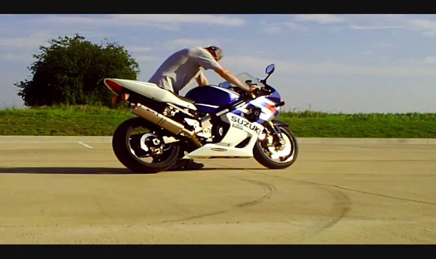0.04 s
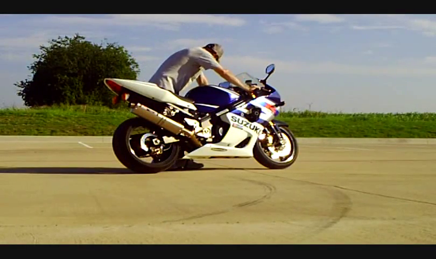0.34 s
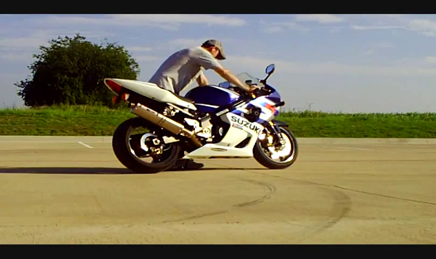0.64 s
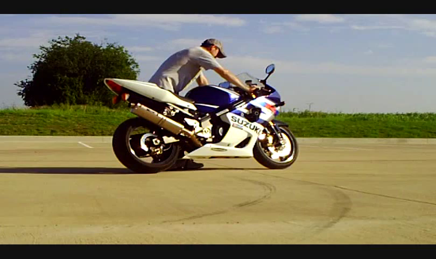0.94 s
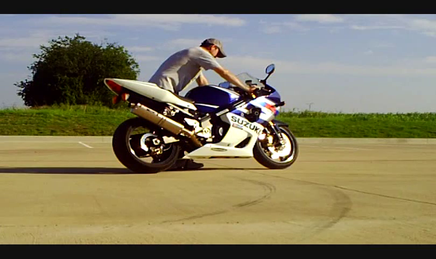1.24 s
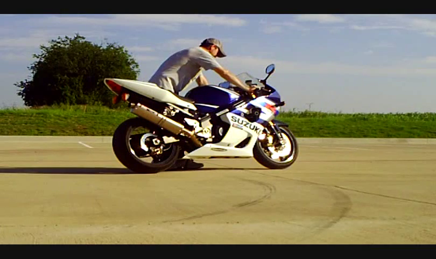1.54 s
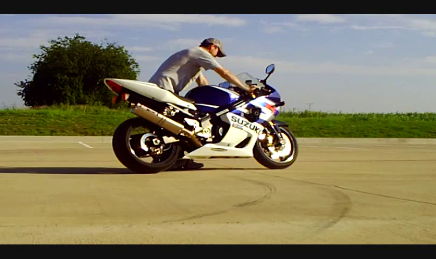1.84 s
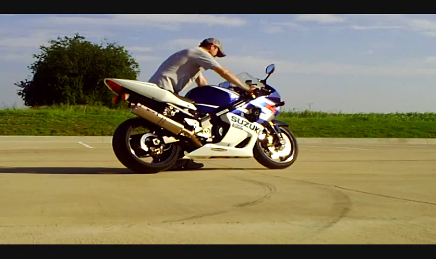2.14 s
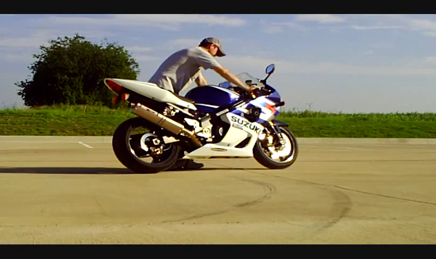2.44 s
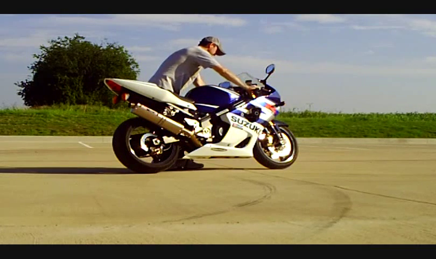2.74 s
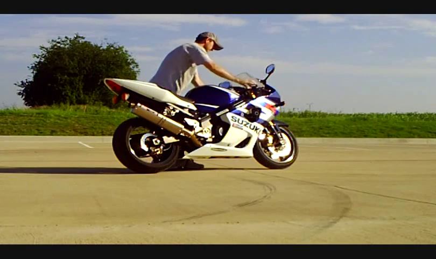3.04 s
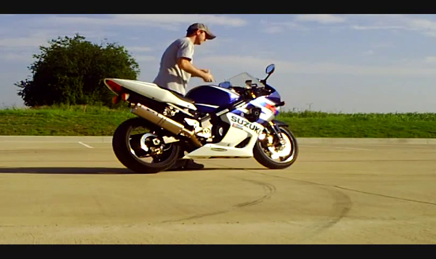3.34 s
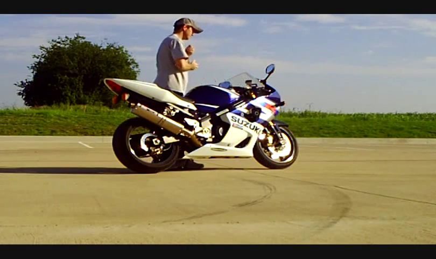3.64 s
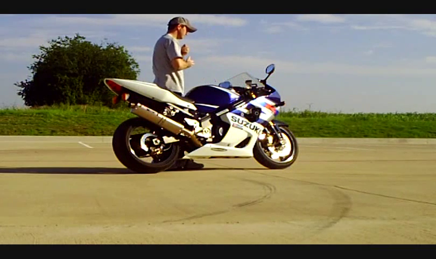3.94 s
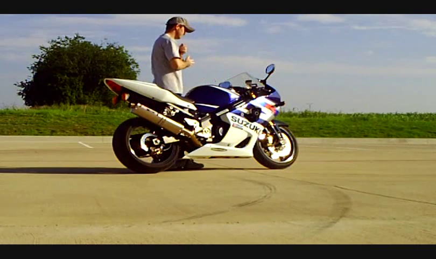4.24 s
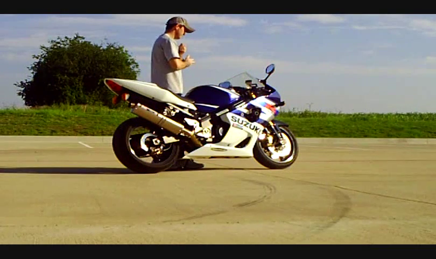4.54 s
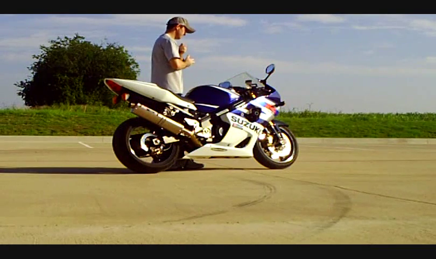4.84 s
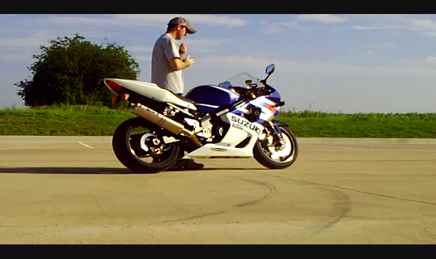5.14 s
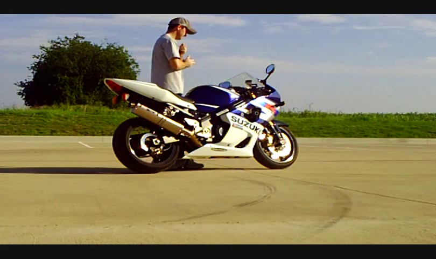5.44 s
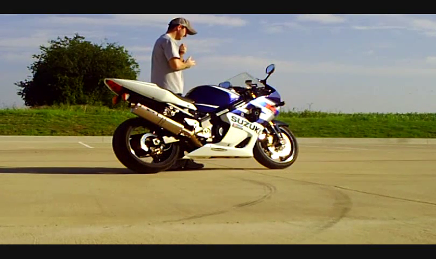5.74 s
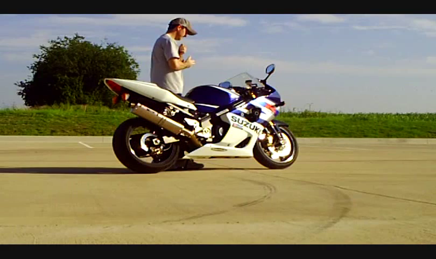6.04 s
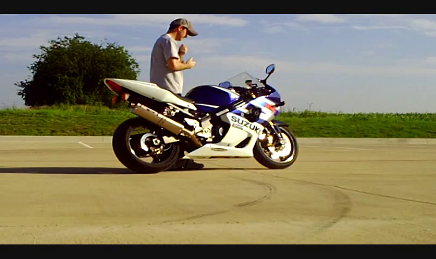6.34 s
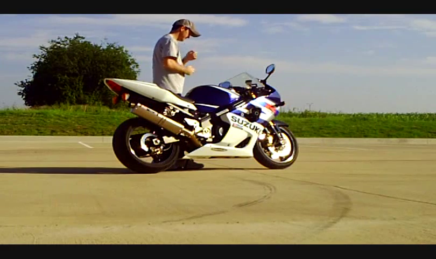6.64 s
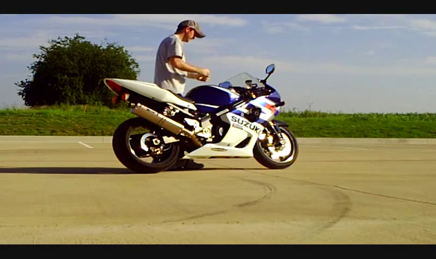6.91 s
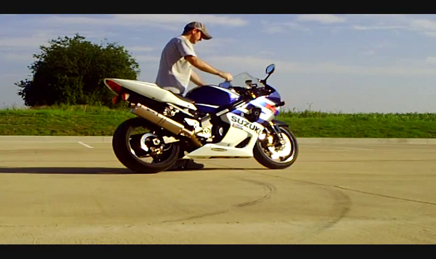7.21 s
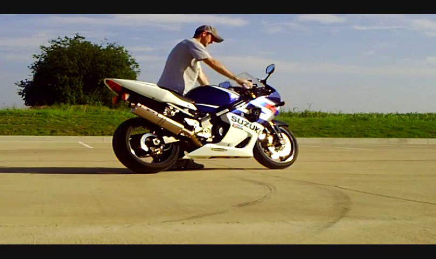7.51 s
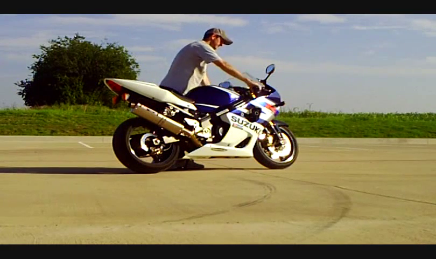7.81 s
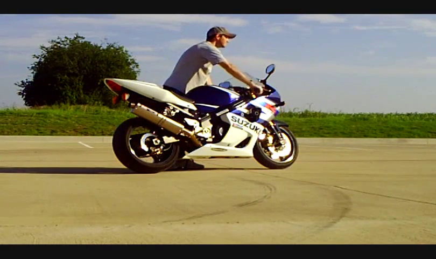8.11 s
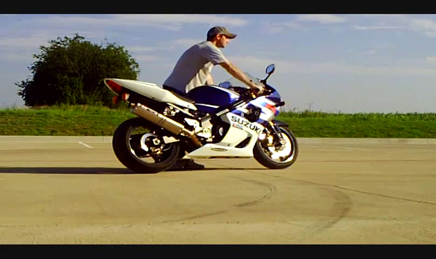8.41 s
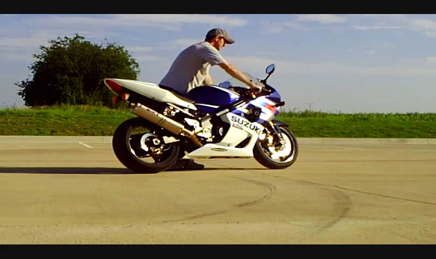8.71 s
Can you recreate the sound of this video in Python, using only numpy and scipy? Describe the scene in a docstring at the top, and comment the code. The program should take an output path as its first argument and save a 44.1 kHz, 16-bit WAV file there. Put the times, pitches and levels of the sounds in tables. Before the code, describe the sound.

Outdoors on an open paved lot, a sport motorcycle is started. After a couple of faint clicks, the starter cranks in short, whining strokes until the engine fires with a brief spit of gas. The revs jump, then fall over a second or so to a deep, uneven idle. The exhaust thuds and occasionally stumbles while the valves tick, with light wind far beneath.

```python
"""Starting a sport motorcycle

A four-cylinder bike starts on an open paved lot. The starter gears whine and sag each time a piston
squeezes its fuel and air. The engine catches, races, then sinks to an idle that keeps dipping and surging.
Each firing pushes gas down the pipe with a thud, some of them weak, over the clatter of valves, chain
and clutch. Light wind and far insects lie behind."""
import sys
import numpy as np
from scipy import signal
from scipy.fft import rfft, irfft, next_fast_len
from scipy.io import wavfile
from scipy.ndimage import map_coordinates

SR = 44100
rng = np.random.default_rng(int(sys.argv[2]) if len(sys.argv) > 2 else 0)


def wav_out(sig):
    """Save sig, one row per channel (or a flat mono array), as 16-bit PCM at SR to the path in sys.argv[1]."""
    wavfile.write(sys.argv[1], SR, np.round(np.clip(np.atleast_2d(sig).T, -1, 1) * 32767).astype(np.int16))


N = 386492

# the four cylinders differ a little, one value each: (strength [dB]) and (delay in the pipe [s])
CYLINDER_DB = [0.052, -0.74, 0.094, 0.21]
CYLINDER_DELAY_S = [0, .0003, 0, .0004]
# firings that burn poorly: (time [s], change in strength [dB], share of gas pushed out late [0-1])
MISFIRES = [(2.371, -11, .3), (2.404, -16, .3), (2.595, -5, 0), (2.65, -9, 0), (2.704, -9, 0),
            (2.8, -8.5, 0), (2.86, -3, .35), (2.95, -6, 0), (3.1, -6, .3), (3.245, -9, .45),
            (3.265, -16, .45), (3.42, -2, .35), (3.44, -4.5, .4), (3.46, -14, .35), (3.51, -9, .1),
            (3.72, -7, 0), (3.99, -9, 0), (4.015, -12, 0), (4.21, -12, .1), (4.28, -7.5, 0),
            (4.96, -8.5, .4), (4.985, 0, .3), (5.205, 0, .42), (5.52, -4, 0), (5.7, -6.5, 0),
            (5.77, 0, .35), (5.795, 0, .3), (5.87, -6.5, 0), (6.08, -4, .15), (6.58, -6, .1),
            (6.88, -12, 0), (6.96, -6, .1), (7.66, -9.5, 0), (7.86, -4, 0), (8.15, -6, 0), (8.41, 0, .35),
            (8.475, -6, .35), (8.5, 0, .42), (8.69, -11, 0)]
# unburnt gas leaves the pipe while the starter turns: (time [s], relative level [dB])
PUFFS = [(1.608, -9), (1.973, -9), (2.02, -2.5), (2.063, -3), (2.146, -6.5)]
# tone of the silencer's boom, the tailpipe's bark and the rasp of gas: (frequency [Hz], gain [dB])
BOOM_TONE = [(5, -79.5), (22, -48.5), (33, 0.5), (42, 0.5), (57, -5.5), (72, -8), (98, 0), (120, -7.5),
             (145, -10), (175, -15), (300, -45), (1500, -73.5)]
BARK_TONE = [(20, -70.5), (130, -23.5), (190, 1.5), (225, -5.5), (260, 1.5), (300, -6), (340, -11.5),
             (420, -18), (520, -23), (700, -37.5), (900, -46), (4000, -62.5)]
RASP_TONE = [(100, -51.5), (250, -16), (360, 2), (480, -3), (620, -12.5), (900, -26.5), (4000, -53.5)]
# how hard each is driven: (idle level [dB], start-up boost [dB], boost fade [s], idle swing [dB])
BOOM_EFFORT = (0.2, 7.3, .5, 2.2)
BARK_EFFORT = (2, 22.2, 0.26, 5.5)
RASP_EFFORT = (-22.5, 9.5, 0.77, 8)


def exhaust(angle, swing, boom_db=30, bark_db=17, gush_db=-32, gush_s=.007, scatter_db=1.4244,
            jitter_s=.00055):
    """Each firing sends a pulse and a gush of gas down the pipe; the pulse's sharp front barks."""
    times = moments(angle, 0.9973)
    uneven = 1 - np.exp(-(times - times[0]) / .3)  # random scatter grows in after the first firings
    chance = uneven[:, None] * rng.standard_normal((len(times), 2))
    size_db, front_db, rasp_db = (np.interp(times, np.arange(N) / SR, effort_db(swing, *effort))
                                  for effort in (BOOM_EFFORT, BARK_EFFORT, RASP_EFFORT))
    burn_db = np.resize(CYLINDER_DB, len(times)) + scatter_db * chance[:, 0]
    size_db[0] -= 3.5  # the first firing only half burns
    front_db[0] -= 14.5
    rasp_db[0] -= 14.5
    front_db[1] += 2.5  # the next lights the fuel left in the pipe and barks harder
    late = np.zeros(len(times))
    for s, loss_db, share in MISFIRES:
        nearest = np.argmin(abs(times - s))
        burn_db[nearest] += loss_db
        late[nearest] = share
    # the valve opens just before the piston ends its stroke; the bark follows once it is wide open
    opening = times - .0051 + np.resize(CYLINDER_DELAY_S, len(times)) + jitter_s * chance[:, 1]
    wide_open = opening + .0022
    gas = amp(.35 * burn_db + size_db + boom_db)  # a poor burn still pushes gas, so it loses less boom
    push = pulses(opening, gas * (1 - late))
    # late gas leaves halfway to the next firing, so the thud breaks into a flutter
    push += pulses(opening + np.gradient(times) / 2, gas * late)
    puff_times, puff_db = np.transpose(PUFFS)
    push += pulses(puff_times, amp(puff_db + boom_db))
    gush = bursts(pulses(opening, amp(size_db + boom_db + gush_db)), gush_s)
    boom = coloured(push + gush, BOOM_TONE)
    bark = coloured(pulses(wide_open, amp(burn_db + front_db + bark_db)), BARK_TONE)
    rasp = coloured(bursts(pulses(wide_open, amp(burn_db + rasp_db)), gush_s), RASP_TONE)
    # the air intake box hums for an instant at 3 s
    hum = amp(-7.5) * gate(3, 3, .02, .02) * resonant(boom, [(106, 42, 0)])
    return boom + bark + rasp + hum


# the engine stumbles and surges back: (time [s], depth [0-1])
STUMBLES = [(2.38, .08), (2.66, .25), (2.86, .15), (3.08, .32), (3.26, .58), (3.459, .32), (3.71, .8),
            (4.01, .8), (4.28, .45), (4.719, .3), (4.98, .67), (5.26, .5), (5.51, .74), (5.78, .55),
            (6.08, .8), (6.359, .55), (6.66, .66), (6.94, .5), (7.151, .2), (7.4, .2), (7.67, .45),
            (7.93, .3), (8.19, .45), (8.46, .9), (8.75, .7)]


def idle_swing(half_length_s=.06):
    """The rise and fall of the engine's power: each stumble is a dip between two surges."""
    t, swing = np.arange(N) / SR, np.zeros(N)
    for s, depth in STUMBLES:
        near = slice(max(int((s - .5) * SR), 0), int((s + .5) * SR))
        offset = (t[near] - s) / half_length_s
        swing[near] -= depth * (1 - offset ** 2) * np.exp(-offset ** 2 / 2)
    return swing


# engine speed before the stumbles are added: (time [s], speed [firings per second])
ENGINE_SPEED = [(2.279, 30.47), (2.33, 62.6), (2.36, 62.25), (2.43, 58.23), (2.6, 56.24), (2.9, 52.36),
                (3.2, 49.79), (3.36, 51.2), (3.52, 44.04), (3.75, 41.04), (4.1, 40.48), (4.5, 40.15),
                (5.0, 40.18), (5.7, 40.65), (6.4, 40.87), (7.0, 40.54), (7.8, 41.0), (8.76, 40.09)]


def crank_angle(swing, swing_share=.128, flywheel_lag_s=.03):
    """How far the engine has turned, counted in firings; the heavy flywheel follows the swing late."""
    t = np.arange(N) / SR
    speed = curve(ENGINE_SPEED) * (1 + swing_share * np.interp(t - flywheel_lag_s, t, swing))
    running = t >= ENGINE_SPEED[0][0]
    return np.cumsum(speed * running) / SR


def effort_db(swing, idle_db, boost_db, fade_s, swing_db, fade_from_s=2.1757):
    """A level that is high as the engine catches, sinks to idle and follows the swing."""
    age = np.maximum(np.arange(N) / SR - fade_from_s, 0)
    return idle_db + boost_db * np.exp(-age / fade_s) + swing_db * swing


# the starter strains against a piston: (time [s], length [s], start pitch [Hz], middle pitch [Hz],
# end pitch [Hz], relative howl [dB], relative grind [dB])
STROKES = [(1.488, .134, 860, 975, 670, -30.3, -39), (1.690, .044, 1330, 1010, 800, -28.5, -34),
           (1.774, .029, 1320, 1130, 1020, -29, -32), (1.855, .046, 1340, 1070, 880, -30.5, -34.5),
           (1.946, .043, 1340, 1080, 800, -29, -34.5), (2.130, .021, 1380, 1240, 1080, -30, -35.5),
           (2.205, .042, 1340, 1110, 900, -31, -36)]
# the howl at 1, 2, 3... times the rate at which the teeth meet: (level [dB])
GEAR_HARMONICS = [0, -5, -5.5, -21, -25]
# loose gears snap together: (time [s], relative level [dB])
CLACKS = [(1.457, -39), (1.489, -30), (1.592, -36), (1.612, -35.5), (1.633, -31.5), (1.702, -23),
          (1.783, -25), (1.882, -34.5), (1.952, -29.5), (1.969, -28.5), (2.136, -27.5), (2.207, -27.5),
          (2.233, -32)]
# tone of the scraping teeth: (frequency [Hz], gain [dB])
TEETH_TONE = [(240, -28), (400, -9), (743, -1), (850, 1), (1110, 6), (1520, -0.5), (1990, 1.5),
              (2270, -2.5), (2750, -1.5), (3150, -4), (3500, -8.5), (4170, -12), (5910, -8), (7050, -11),
              (8860, -6), (10000, -13), (13000, -39), (22000, -120)]
# notes at which the starter's housing rings: (frequency [Hz], width [Hz], gain [dB])
HOUSING_NOTES = [(960, 31, -20), (1119, 32, -7), (1667, 32, 9.5), (1917, 25, 1), (2068, 25, 6),
                 (2567, 70, 3.5), (2850, 90, 6), (3900, 39, 0), (4520, 52, 13), (5680, 53, 5),
                 (8400, 62, 9), (9045, 64, 7.5)]


def starter(on_s=1.451, off_s=2.275, whirr_db=-38, free_spin_hz=1160, knocks_per_s=420):
    """The gears whirr; each squeeze of a piston slows them, so that they clack, howl and grind."""
    howl, grind = np.zeros(N), np.zeros(N)
    shake = wobble(350)
    for s, length, start_hz, middle_hz, end_hz, howl_db, grind_db in STROKES:
        progress = np.linspace(0, 1, int(length * SR))
        span = slice(round(s * SR), round(s * SR) + len(progress))
        pitch = np.polyval(np.polyfit([0, .5, 1], [start_hz, middle_hz, end_hz], 2), progress)
        pitch *= 1 + .0013 / length * shake[span]  # short, hard strokes shake the teeth most
        phase = 2 * np.pi * np.cumsum(pitch) / SR
        tone = sum(amp(db) * np.sin(k * phase) for k, db in enumerate(GEAR_HARMONICS, 1))
        force = np.sin(np.pi * progress).clip(0)
        howl[span] += amp(howl_db) * force * tone
        grind[span] += amp(grind_db) * np.sqrt(force)
    whirr = amp(whirr_db) * gate(on_s, off_s, attack=.012, release=.035)
    bite = amp(2.5 * wobble(420))  # the teeth grip unevenly
    times, db = np.transpose(CLACKS)
    clacks = bursts(pulses(times, amp(db - 1.5)), life=.005)
    knocks = (rng.random(N) < knocks_per_s / SR) * rng.choice([-1, 1], N)
    grit = unit(knocks * rng.uniform(0.62, 1, N))
    pressure = whirr + amp(-2) * grind
    # knocks between the teeth and the howl both ring the engine case
    case = ringing(amp(-3) * pressure * grit + amp(-23.5) * howl, ring_s=.0322)
    scrape = amp(-5) * pressure * rng.standard_normal(N)
    teeth = recoloured(scrape + case + clacks, TEETH_TONE)
    free_spin = np.sin(2 * np.pi * np.cumsum(free_spin_hz * (1 + 0.03664 * wobble(120))) / SR)
    howl *= bite
    # the housing squeals whenever the howl slides past one of its notes
    housing = resonant(amp(-3) * howl + amp(-13) * teeth, HOUSING_NOTES)
    return amp(.3) * howl + housing + teeth + amp(-15) * whirr * free_spin


# the first firings spit from the pipe: (time [s], level [dB])
SPITS = [(2.286, -39.5), (2.307, -31), (2.329, -42)]
# tone of that hiss: (frequency [Hz], gain [dB])
SPIT_TONE = [(400, -22.5), (1200, 0), (3300, 1), (4300, -6.5), (6000, -11.5), (10000, -14), (22000, -79)]


def spit():
    """Gas hisses briefly out of the pipe as the engine catches."""
    times, db = np.transpose(SPITS)
    return recoloured(bursts(pulses(times, amp(db)), life=.009), SPIT_TONE)


# tone of the engine's casing: (frequency [Hz], gain [dB])
CASING_TONE = [(260, -18), (450, 3), (631, 2), (709, 3), (839, 1), (1030, 3), (1450, 2), (1580, -4),
               (1850, -4), (3110, 0.5), (3800, -11), (4800, -11), (6350, -7), (7140, -13.5), (8900, -6),
               (10000, -17.5), (13000, -66.5), (22000, -120)]
# notes at which its covers ring: (frequency [Hz], width [Hz], gain [dB])
COVER_NOTES = [(930, 74, 3.5), (1749, 13, 2), (1931.5, 30, -0.5), (3047, 41, -4), (3901, 80, -6),
               (5710, 48, -8), (6214, 100, -4), (8507, 110, -7), (9165, 116, -4.5)]
# strength of the clatter: (idle level [dB], start-up boost [dB], boost fade [s], idle swing [dB])
CLATTER_EFFORT = (-46.5, 4, 0.4, 1.65)


def valve_gear(angle, swing, rush_db=-3, tick_db=-8, head_db=-3, cover_db=-9, scatter_db=1.8, lag_s=.005):
    """Chain and gears rush harder after each firing; valves tick shut and ring the covers."""
    t = np.arange(N) / SR
    throb = amp(.5 * np.cos(2 * np.pi * np.interp(t - lag_s, t, angle)) + 0.38 * wobble(25))
    rush = unit(throb * rng.standard_normal(N))
    times = moments(angle, 2)
    chance = rng.standard_normal((len(times), 2))
    sizes = amp(scatter_db * chance[:, 0] + np.resize([0, -4], len(times)))  # every other tick is softer
    taps = pulses(times + lag_s + .0012 * chance[:, 1], sizes)
    ticks = unit(bursts(taps, life=.016))
    head = unit(ringing(taps, ring_s=.259))  # the metal block on top of the cylinders
    layers = [(rush, rush_db), (ticks, tick_db), (head, head_db)]
    casing = sum(amp(db) * unit(coloured(x, CASING_TONE)) for x, db in layers)
    covers = amp(cover_db) * unit(resonant(.5 * rush + ticks, COVER_NOTES))
    running = np.clip(angle, 0, 1)
    return running * amp(effort_db(swing, *CLATTER_EFFORT)) * (casing + covers)


# notes at which the chain's guide rings: (frequency [Hz], width [Hz], gain [dB])
GUIDE_NOTES = [(1126, 61, -1), (1265.6, 90, 0.5), (1368.7, 80, 1), (1472, 37, -1), (1720, 120, -9)]


def cam_chain(angle, slap_db=-51, lag_s=.003):
    """Each firing jerks the chain that drives the valves against its guide."""
    return amp(slap_db) * knocking(moments(angle, 0.999) + lag_s, GUIDE_NOTES, life=.0095)


# notes at which the clutch's drum rings: (frequency [Hz], width [Hz], gain [dB])
CLUTCH_NOTES = [(693.3, 15.9, 0), (738.6, 20.1, -2), (955, 34, 1.5)]


def clutch(angle, rattle_db=-51, lag_s=.004, from_s=3.04):
    """Once the speed has sunk, the clutch's loose drum knocks at every second firing."""
    fade_in = gate(from_s, N / SR, attack=.34, release=1)
    return amp(rattle_db) * fade_in * knocking(moments(angle, .5) + lag_s, CLUTCH_NOTES, life=.008)


# the handlebar switches are pressed: (time [s], relative level [dB])
CLICKS = [(.295, -52), (1.004, -45)]


def switches():
    """Switches snap and ring faintly before the start."""
    times, db = np.transpose(CLICKS)
    snaps = bursts(pulses(times, amp(db + 2)), life=.012)
    return resonant(snaps, [(3050, 220, 0), (3750, 400, -9)])


# tone of wind and far traffic: (frequency [Hz], gain [dB])
AIR_TONE = [(13, -17.5), (22, 0.5), (102, 0), (143, -3.5), (204, -8), (232, -6), (264, -11.5), (418, -19),
            (1260, -24.5), (2150, -41), (4760, -44), (5410, -54.5), (6640, -48.5), (7170, -42.5),
            (10000, -41.5), (13000, -73.5), (22000, -120)]


def outdoors(air_db=-42, insects_db=-72):
    """A steady, soft rush of air and the thin hiss of far insects."""
    air = unit(coloured(rng.standard_normal(N), AIR_TONE))
    chirr = [(5466, 890, 0)]
    insects = unit(resonant(resonant(rng.standard_normal(N), chirr), chirr))
    return amp(air_db) * air + amp(insects_db) * insects


def amp(db):
    """Turns decibels into a gain."""
    return 10 ** (np.asarray(db) / 20)


def unit(x):
    """Scales x to an average (rms) level of 1."""
    return x / np.sqrt(np.mean(x ** 2) + 1e-20)


def curve(rows):
    """Joins (time [s], value) points into one value per sample."""
    return np.interp(np.arange(N) / SR, *np.transpose(rows))


def wobble(rate):
    """A smooth curve through rate random points a second."""
    return map_coordinates(rng.standard_normal(int(N * rate / SR) + 4), [np.arange(N) * rate / SR])


def gate(start, end, attack, release):
    """A gain that rises from start and dies away from end; all in seconds."""
    t = np.arange(N) / SR
    return (1 - np.exp(-np.maximum(t - start, 0) / attack)) * np.exp(-np.maximum(t - end, 0) / release)


def moments(angle, per_firing):
    """Times of something that the engine does per_firing times a firing."""
    marks = np.arange(int(angle[-1] * per_firing) + 1) / per_firing
    return np.searchsorted(angle, marks, side="right") / SR


def pulses(times, sizes):
    """One sharp spike at each time."""
    index = np.maximum(np.round(times * SR).astype(int), 0)
    return np.bincount(index, sizes, N)[:N]


def bursts(train, life):
    """Each spike becomes a puff of noise that dies in about life seconds."""
    envelope = signal.lfilter([1], [1, -np.exp(-1 / (life * SR))], train)
    return envelope * rng.standard_normal(N)


def knocking(times, notes, life, jitter_s=.0012, scatter_db=1):
    """Slightly uneven knocks; each rings the notes differently."""
    chance = rng.standard_normal((len(times), 2))
    blows = pulses(times + jitter_s * chance[:, 0], amp(scatter_db * chance[:, 1]))
    return unit(resonant(bursts(blows, life), notes))


def ringing(x, ring_s):
    """Cast metal rings at many notes at once, fading by 60 dB in ring_s."""
    t = np.arange(SR // 5) / SR
    body = rng.standard_normal(len(t)) * amp(-60 * t / ring_s)
    return signal.fftconvolve(x, body / np.linalg.norm(body))[:N]


def resonant(x, notes):
    """Lets x ring at (frequency [Hz], width [Hz], gain [dB]) notes."""
    m = next_fast_len(N + SR // 2)
    f = np.fft.rfftfreq(m, 1 / SR)
    response = sum(amp(db) * 1j * f * width / (hz * hz - f * f + 1j * f * width)
                   for hz, width, db in notes)
    return irfft(rfft(x, m) * response, m)[:N]


def coloured(x, tone):
    """Filters x by a (frequency [Hz], gain [dB]) curve."""
    m = 2 * next_fast_len(N // 2 + SR // 2)
    hz, db = np.transpose(tone)
    log_gain = np.log(amp(np.interp(np.log(np.fft.rfftfreq(m, 1 / SR) + 1), np.log(hz), db)))
    cepstrum = irfft(log_gain, m)
    cepstrum[1:m // 2] *= 2  # folded so that the filter rings only after a blow, never before
    cepstrum[m // 2 + 1:] = 0
    return irfft(rfft(x, m) * np.exp(rfft(cepstrum)), m)[:N]


def recoloured(x, tone):
    """Like coloured, but plain noise keeps its level."""
    return coloured(x, tone) / np.std(coloured(rng.standard_normal(N), tone))


def scene():
    """Starter, exhaust and engine clatter in the open air, in mono."""
    swing = idle_swing()
    angle = crank_angle(swing)
    clatter = valve_gear(angle, swing) + cam_chain(angle) + clutch(angle)
    return (switches() + starter() + spit() + exhaust(angle, swing) + clatter + outdoors())[None]


def record(dry, top_hz=10100):
    """Cuts away the treble above top_hz."""
    m = next_fast_len(N + SR // 2)
    return irfft(rfft(dry, m) * (np.fft.rfftfreq(m, 1 / SR) < top_hz), m)[..., :N]


dry = scene()
out = record(dry)
wav_out(out)
```